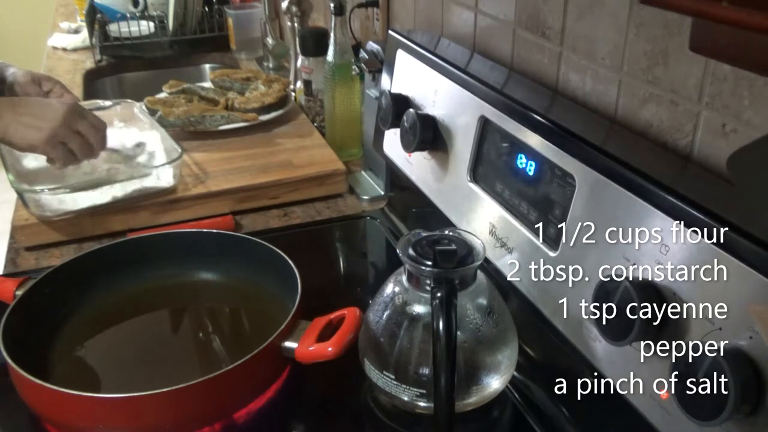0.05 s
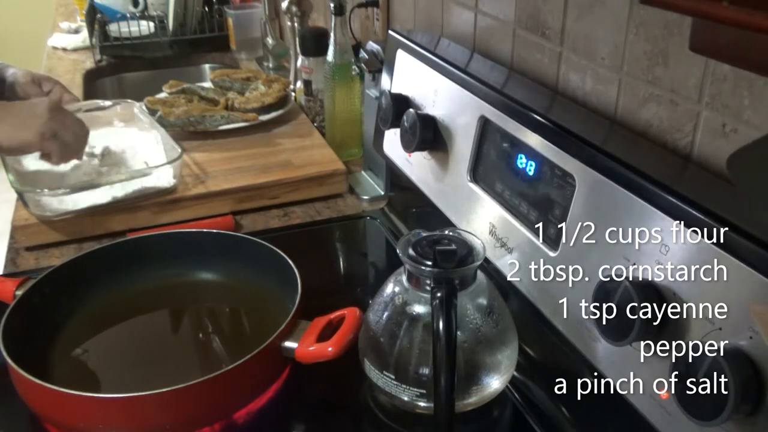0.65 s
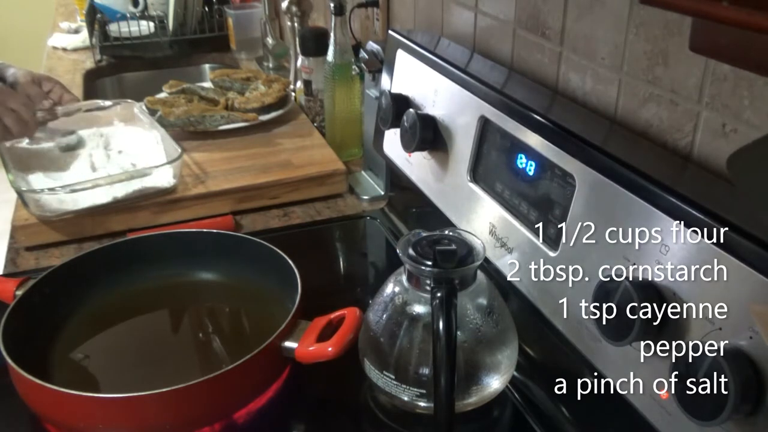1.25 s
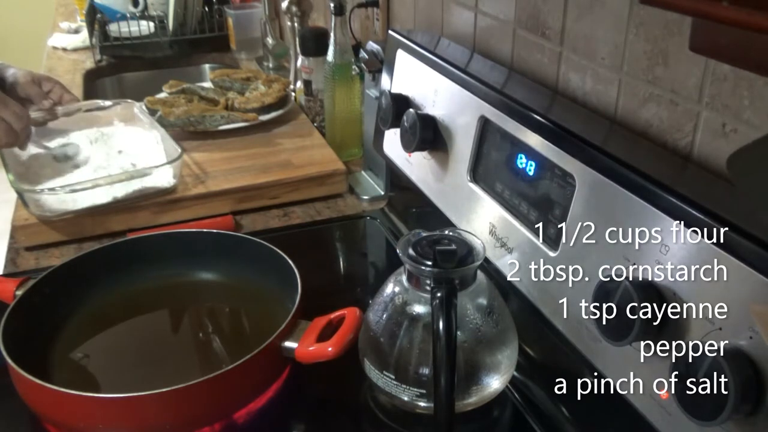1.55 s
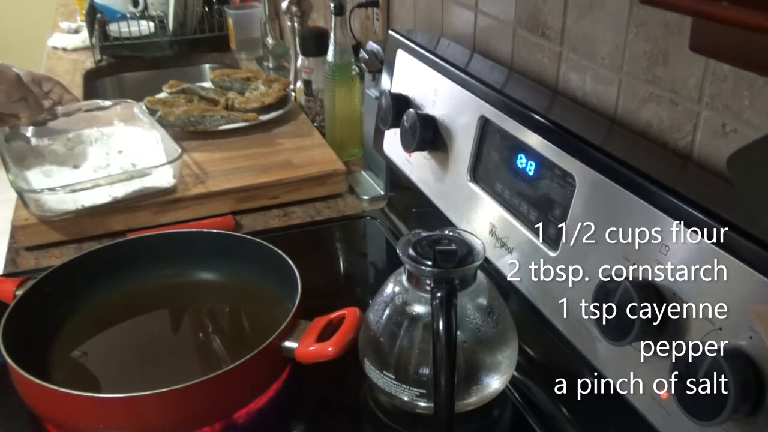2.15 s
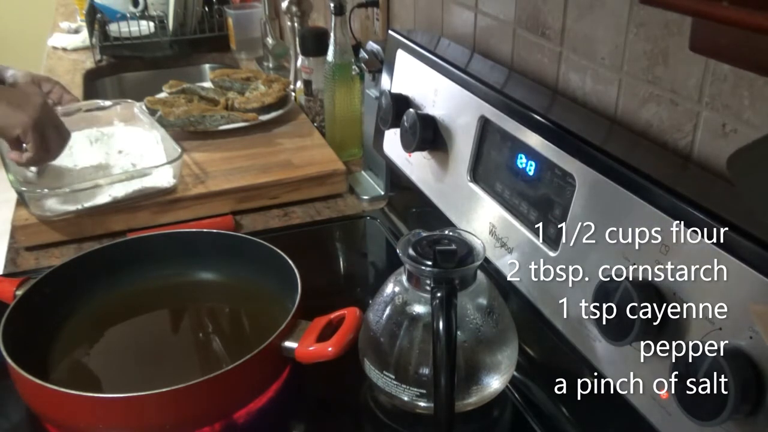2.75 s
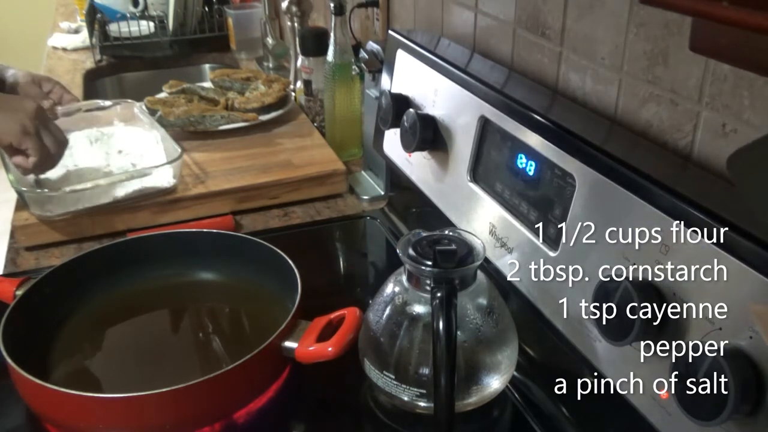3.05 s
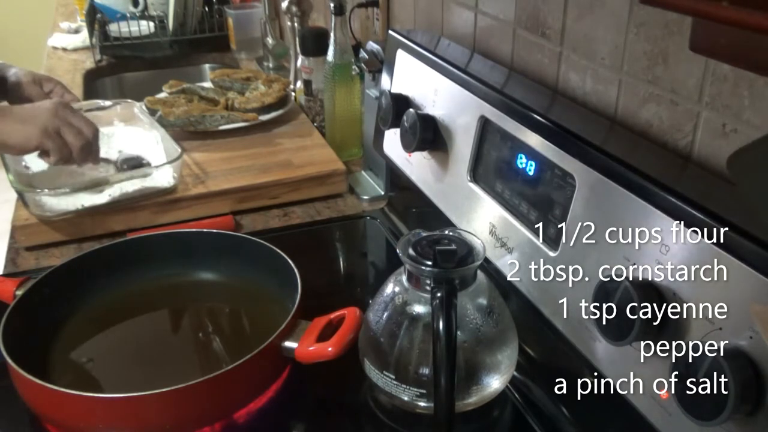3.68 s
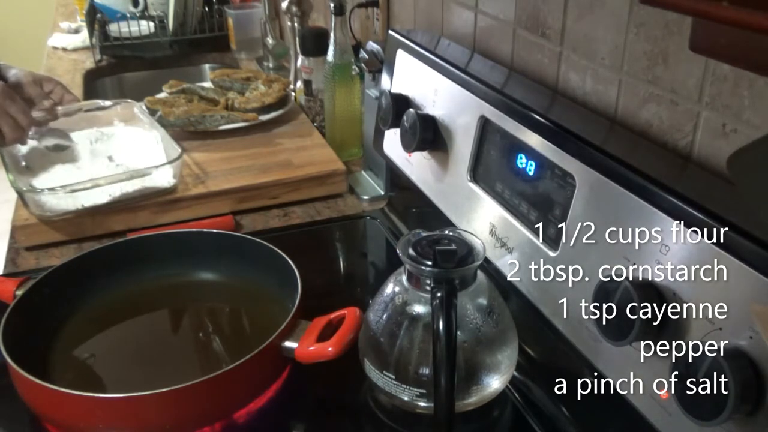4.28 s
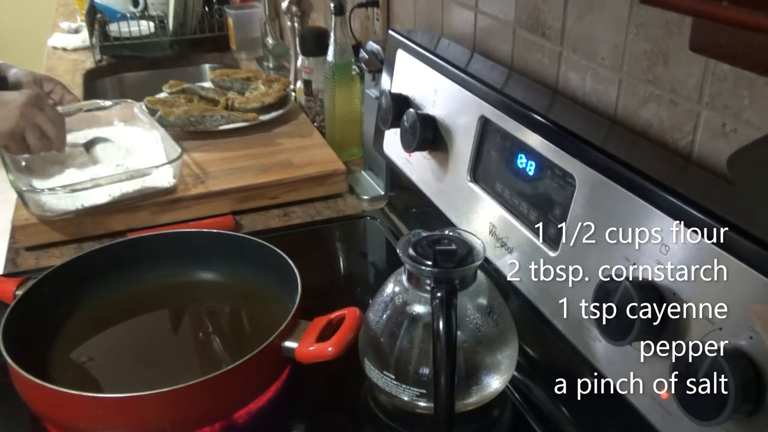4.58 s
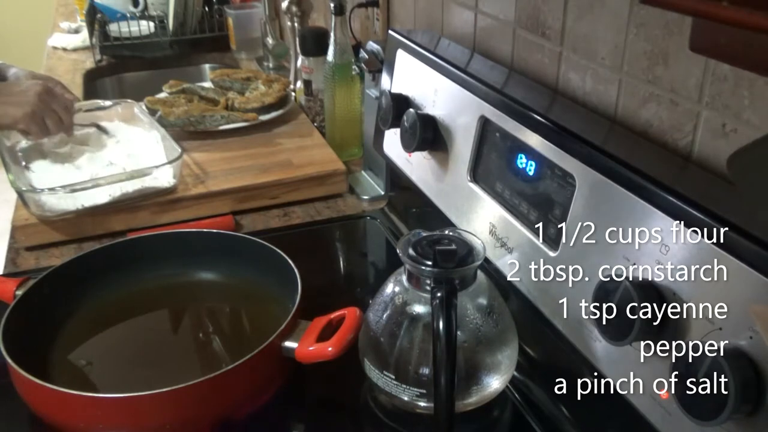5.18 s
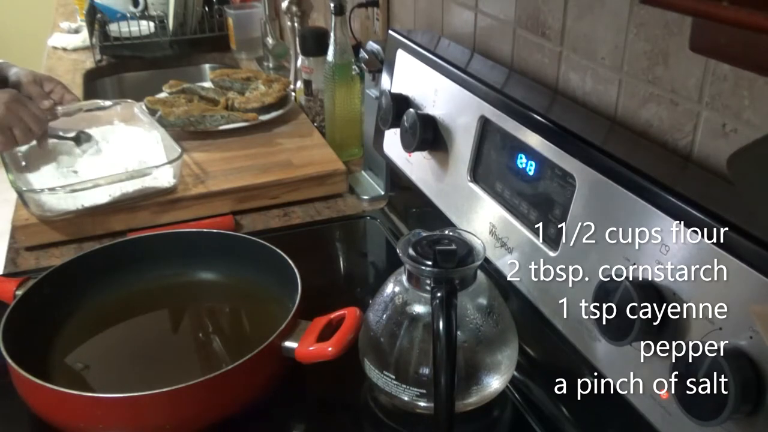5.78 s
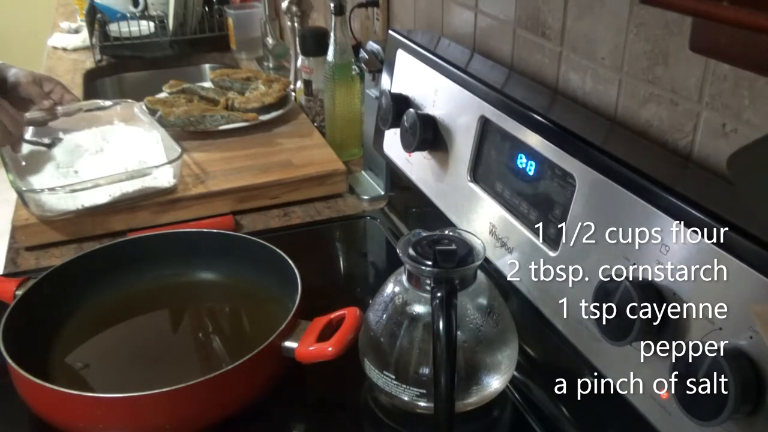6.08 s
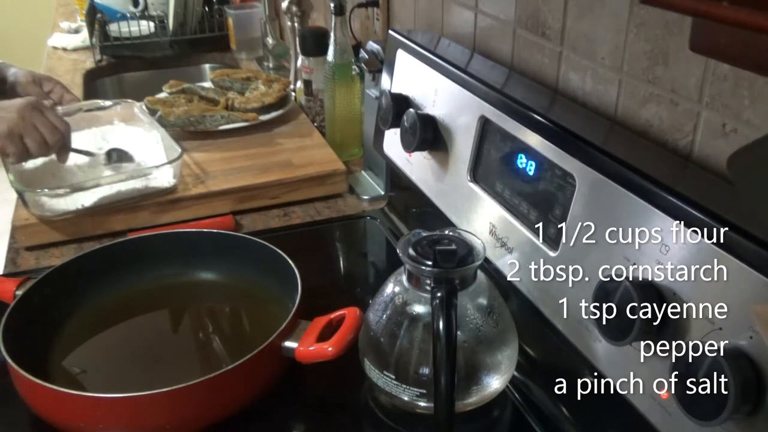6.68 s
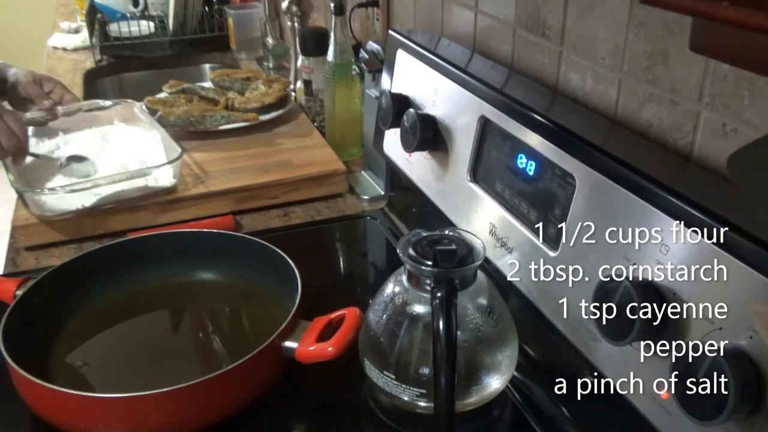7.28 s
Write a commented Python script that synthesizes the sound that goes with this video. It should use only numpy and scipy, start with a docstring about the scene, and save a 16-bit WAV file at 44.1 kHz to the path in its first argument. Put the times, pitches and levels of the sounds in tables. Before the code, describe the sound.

A metal spoon stirs flour in a glass baking dish for about seven and a half seconds, heard close and slightly left in a small kitchen. A soft fan rush, a faint deep drone and a low electric stove hum are present from the start. The spoon knocks unevenly against the glass, each clink short and damped by powder, with quiet grainy swishes and brief scrapes between. One clink comes right at the start, followed by light ticks. Louder knocks land at 1.4 and 1.8 seconds, with a strong pair near 2.1 and lighter ones from 2.6 to 3.6. Another firm knock falls at 4. Around 4.6 the dish judders faintly on its wooden board, a thermostat clicks softly and the hum drops. A sharp, loud clink follows at 4.8, then more swishing and rubbing, with duller knocks near 6, 6.5 and 6.9 seconds.

```python
"""A small kitchen: from the start a fan rushes softly over a deep drone and an electric stove hums.
A metal spoon stirs flour in a glass baking dish on a wooden board. It knocks against the walls,
whose ring the powder damps, swishes through the grains and rubs over the bare bottom.
At 4.6 s the dish judders once on its board. Just after, the thermostat clicks off and the hum
falls to a faint rest; the stirring goes on to the end."""
import sys
import numpy as np
from scipy import signal
from scipy.fft import rfft, irfft, next_fast_len
from scipy.io import wavfile
from scipy.ndimage import uniform_filter1d, map_coordinates

SR = 44100
rng = np.random.default_rng(int(sys.argv[2]) if len(sys.argv) > 2 else 0)


def wav_out(sig):
    """Save sig, one row per channel (or a flat mono array), as 16-bit PCM at SR to the path in sys.argv[1]."""
    wavfile.write(sys.argv[1], SR, np.round(np.clip(np.atleast_2d(sig).T, -1, 1) * 32767).astype(np.int16))


N = 328104

# Fan air spectrum. Each row: frequency in Hz, relative density in dB.
FAN_SPECTRUM = [(15, -22), (30, -9.5), (60, -4.5), (90, -6), (170, -8.5), (260, -4.5), (340, -9), (400, -1),
                (490, -1.5), (600, -7), (1000, -12), (2000, -20.5), (6000, -28.5), (16000, -34.5)]
# Deep drone. Each row: time in seconds, level in dB.
DRONE_LEVELS = [(0, -62.5), (.5, -59), (1.9, -55), (2.2, -70), (7.44, -67)]
# Spoon against glass. Each row: start in seconds, level in dB, hardness in dB of treble over bass,
# powder cushion cut-off in Hz, favoured note in Hz, its lift in dB, ping in Hz.
KNOCKS = [(0.1476, -23.5, -8.5, 15800, 820, 4, 11000), (.431, -43.5, 20, 9000, 1140, 20, 3750),
          (0.518, -46.5, 3, 12000, 2300, 7, 4780), (0.579, -37, -7, 14560, 1180, -1, 2860),
          (0.746, -42, -5, 14000, 1050, 13, 2920), (1.354, -16, -5, 11500, 1020, 10, 6900),
          (1.7799, -16, 6.5, 11100, 920, 4.5, 3340), (2.0751, -10.5, -0.5, 8400, 1170, 5, 5630),
          (2.1641, -14.5, 26, 8200, 1310, 12, 4950), (2.613, -23, -12.5, 9050, 1330, 10, 3530),
          (2.633, -25, -4, 1980, 1050, 3, 3600), (2.7097, -23, 16.5, 19000, 940, 9.5, 5000),
          (2.9822, -23, 4, 11800, 1140, 1.5, 2900), (3.13, -37.5, 28, 14000, 1130, -4, 4100),
          (3.6431, -22.5, -7.5, 14000, 1230, -1, 4260), (3.9908, -14.5, -1.5, 9200, 1075, 5.5, 5200),
          (4.419, -21.5, -9.5, 15000, 1030, 5.5, 4150), (4.5892, -47, -3, 15000, 1910, -1, 2960),
          (4.8462, -11.5, 11, 8460, 1220, 5, 5930), (5.4244, -37.5, -7, 15000, 1070, 10.5, 5800),
          (5.964, -36.5, 25, 9000, 1960, -4, 3900), (6.039, -25.5, -15.5, 2100, 1010, 3, 3020),
          (6.489, -17.5, -2.5, 3670, 1180, 4, 2700), (6.9053, -28, -23, 1450, 450, 13.5, 5430)]
# Modes of the dish on its board. Each row: frequency in Hz, relative level in dB, t60 in seconds.
DISH_MODES = [(305, -9.5, 0.032), (460, -13.5, 0.15), (497, -2, 0.1), (890, -1, 0.11), (974, 3.5, 0.027),
              (1036, -18, 0.026), (1151, 5, 0.074), (1242.4, -8, 0.062), (1349, -6.5, 0.32),
              (1524, -12, 0.19), (1625, -0.5, 0.17), (1690, -28, 0.2), (1879, 4.5, 0.03), (2040, -4, 0.078),
              (2120, 2.5, 0.015), (2263, -17.5, 0.089), (2515, -29, 0.13), (2890, 2, 0.015),
              (2910, -3, 0.021), (3028, 3.5, 0.028), (3690, 4.5, 0.026), (5070, -40, 0.11),
              (5440, -18, 0.11), (5690, -4.5, 0.01), (6720, -5.5, 0.016), (7900, -10, 0.047),
              (8900, -43, 0.24)]
# Dense, quickly damped part of a knock. Each row: frequency in Hz, relative density in dB.
CRACK_SPECTRUM = [(100, -49), (300, -6.5), (750, -3), (1000, -0.5), (1700, 3.5), (2450, -3), (2950, -4.5),
                  (3350, -14.5), (3800, -5.5), (6000, -15), (6350, -19), (8000, -16.5), (11300, -23.5),
                  (16000, -54)]
# Spoon pushing through flour. Each row: peak time in seconds, rise in seconds, fall in seconds,
# effort in dB, singing resonance in Hz.
PUSHES = [(.33, 0.1, 0.076, -41.5, 5800), (.62, 0.039, 0.033, -38, 1150), (.77, .02, 0.014, -43, 3040),
          (.89, 0.036, .04, -49.5, 4100), (1.11, 0.073, 0.045, -45.5, 1150),
          (1.44, 0.051, 0.034, -41.5, 8300), (2.75, 0.042, 0.03, -36.5, 10700),
          (3.1, 0.064, 0.16, -35.5, 6950), (3.33, 0.02, 0.046, -54.5, 6950),
          (3.76, 0.068, 0.026, -47, 8300), (4.09, 0.068, 0.048, -47, 3040), (4.53, .07, 0.049, -45.5, 1680),
          (5, 0.034, 0.036, -35, 5770), (5.25, 0.067, 0.046, -38, 3040), (6.2, 0.093, 0.059, -51, 8300),
          (7.1, 0.069, 0.024, -45.5, 8300)]
# Slipping flour. Each row: frequency in Hz, relative density in dB.
FLOUR_SPECTRUM = [(300, -31), (900, -8), (1150, 2.5), (2300, -3.5), (4000, -6), (5000, -11), (6000, -12),
                  (8500, -12), (11500, -19.5), (13000, -26), (16000, -32)]
# Spoon resonances under friction. Each row: centre in Hz, width in Hz, nominal lift in dB.
SPOON_MODES = [(1150, 80, 7), (1680, 140, 5), (3040, 220, 12), (4100, 280, 12), (5900, 300, 8),
               (6950, 380, 9), (8300, 440, 7), (10700, 500, 8)]
# Stick-slip: the spoon's edge chattering on glass, and one low judder of the dish on its board.
# Each row: start in seconds, length in seconds, relative level in dB, centre in Hz.
STICK_SLIPS = [(0.586, 0.087, -48, 1310), (2.262, 0.13, -48.5, 2100), (4.62, 0.18, -55.5, 392),
               (4.929, .11, -38.5, 2070), (5.201, 0.1, -50.5, 2050), (5.752, 0.057, -51, 1130)]
# Thermostat click. Each row: frequency in Hz, relative density in dB.
CLICK_SPECTRUM = [(500, 11), (2400, 2), (3000, 18), (3700, -5), (8500, 3), (16000, -12)]
# Kitchen reverberation. Each row: frequency in Hz, t60 in seconds.
KITCHEN_T60 = [(150, 0.56), (1000, 0.42), (2500, 0.41), (6000, 0.36), (14000, 0.34)]
# Stereo width of diffuse sound. Each row: frequency in Hz, side gain in dB.
SIDE_GAINS = [(60, -30), (130, -20), (300, -18), (550, -12), (1000, -6.5), (2500, -6.5), (8000, -4.5),
              (10500, -7), (12500, -21)]

THERMOSTAT_OFF_S = 4.667


def amp(db):
    """Decibels to gain."""
    return 10 ** (np.asarray(db) / 20)


def unit_rms(x):
    """Scale to rms 1."""
    return x / np.sqrt(np.mean(x ** 2) + 1e-20)


def unit_energy(x):
    """Scale each row to energy 1."""
    return x / np.sqrt(np.sum(x ** 2, axis=-1, keepdims=True) + 1e-20)


def log_interp(points, hz):
    """Read (Hz, value) points on a log axis."""
    points_hz, values = np.transpose(points)
    return np.interp(np.log(hz + 1), np.log(points_hz + 1), values)


def bell(hz, centre_hz, width_hz):
    """Resonance curve, 1 at its centre."""
    return 1 / (1 + (2 * (hz - centre_hz) / width_hz) ** 2)


def wobble(rate_hz):
    """Smooth random curve."""
    knots = rng.standard_normal(int(N * rate_hz / SR) + 4)
    return map_coordinates(knots, [np.arange(N) * rate_hz / SR])


def filtered(x, gain):
    """Apply gain(Hz) to x."""
    n = x.shape[-1]
    padded = next_fast_len(n + 8192)
    return irfft(rfft(x, padded) * gain(np.fft.rfftfreq(padded, 1 / SR)), padded)[..., :n]


def noise(shape, spectrum):
    """Noise coloured by (Hz, dB) points."""
    return filtered(rng.standard_normal(shape), lambda hz: amp(log_interp(spectrum, hz)))


def add(track, start_s, sound):
    """Mix a sound into a track."""
    part = track[..., round(start_s * SR):][..., :sound.shape[-1]]
    part += sound[..., :part.shape[-1]]


def stereo(mid, side):
    """Two close microphones; long waves reach both alike."""
    side = filtered(side, lambda hz: amp(log_interp(SIDE_GAINS, hz)))
    return np.array([mid + side, mid - side])


def in_kitchen(x, tail_db, early_db):
    """Direct sound, quick echoes off counter and tiles, then the room's tail."""
    hz, frame_s, spectra = signal.stft(rng.standard_normal((2, SR // 2)), SR, nperseg=256)
    decay = amp(-60 * frame_s / log_interp(KITCHEN_T60, hz)[:, None])
    tail = signal.istft(spectra * decay, SR, nperseg=256)[1]
    t = np.arange(tail.shape[1]) / SR
    tail = unit_energy(tail * (1 - np.exp(-t / .003)))
    early = unit_energy(rng.standard_normal(tail.shape) * (t > .001) * np.exp(-t / .0014))
    mid, side = amp(tail_db) * tail + amp(early_db) * early
    mid[0] += 1  # direct path
    return signal.fftconvolve(x[None], stereo(mid, side), axes=1)[:, :N]


def fan():
    """Moving air: a soft, slightly wavering rush."""
    mid, side = noise((2, N), FAN_SPECTRUM)
    return stereo(mid, side) / np.std(mid) * amp(-42.5 + 1.2 * wobble(7.1))


def drone(centre_hz=34, width_hz=6):
    """A deep noise band swells, then drops back near 2 s."""
    band = filtered(rng.standard_normal(N), lambda hz: np.exp(-((hz - centre_hz) / width_hz) ** 2))
    level_db = np.interp(np.arange(N) / SR, *np.transpose(DRONE_LEVELS))
    return amp(level_db) * unit_rms(band)


def stove_hum(hum_hz=120):
    """The element hums at twice the mains rate, only faintly once the thermostat opens."""
    t = np.arange(N) / SR
    tone = np.sqrt(2) * np.sin(2 * np.pi * hum_hz * t + .06 * wobble(5))
    heating = np.exp(-np.maximum(t - THERMOSTAT_OFF_S, 0) / .013)
    return tone * (amp(-48.5) * heating + amp(-56.5)) * amp(wobble(3.7))


def contact_gain(hz, hardness_db, cushion_hz, note_hz, note_db, ping_hz):
    """A bare edge is bright, powder dulls it, and the spot struck favours a note and a ping."""
    pivot_hz, span_octaves, ping_db, leak_db = 1860, .9, 8, -17
    edge_db = hardness_db / 2 * np.tanh(np.log2((hz + 1) / pivot_hz) / span_octaves)
    spot_db = note_db * bell(hz, note_hz, .23 * note_hz) + ping_db * bell(hz, ping_hz, .06 * ping_hz)
    cushion = 1 / np.sqrt(1 + (hz / cushion_hz) ** 8)
    return amp(edge_db + spot_db) * (cushion + amp(leak_db))


def knocks(crack_t60_s=.068, attack_s=.0014):
    """Each knock rings the dish through its own contact; the pressing spoon detunes the modes a little."""
    out, t = np.zeros((2, N)), np.arange(SR // 4) / SR
    mode_hz, mode_db, t60_s = np.transpose(DISH_MODES)
    decay = amp(-60 * t / t60_s[:, None])
    attack = 1 - np.exp(-t / attack_s)
    for start_s, level_db, *contact in KNOCKS:
        hz = mode_hz * (1 + .005 * rng.standard_normal(len(mode_hz)))
        strengths = unit_energy(amp(mode_db + 1.34 * rng.standard_normal(len(hz))))
        phase = rng.uniform(0, 2 * np.pi, (len(hz), 1))
        modes = unit_energy(np.sin(2 * np.pi * hz[:, None] * t + phase) * decay)
        ring = (strengths * contact_gain(hz, *contact)) @ modes
        grit = unit_rms(noise(len(t), CRACK_SPECTRUM))
        crack = filtered(grit, lambda f: contact_gain(f, *contact))
        crack *= unit_energy(amp(-60 * t / crack_t60_s))
        knock = in_kitchen((ring + crack) * attack, tail_db=-5.5, early_db=-12)
        add(out, start_s, amp(level_db) * knock / np.std(knock[:, :SR // 50]))  # rms of first 20 ms
    return out


def pushes(glide_db=-57, climb_per_s=.3, sag=.07):
    """Pushes swell above a steady glide; pitch climbs as the contact slides and sags as it eases."""
    t = np.arange(N) / SR
    peak_s, rise_s, fall_s, push_db, singing_hz = np.transpose(PUSHES)[..., None]
    from_peak = np.maximum((peak_s - t) / rise_s, (t - peak_s) / fall_s)
    swells = np.exp(-np.minimum(from_peak, 10) ** 1.6)
    effort = amp(glide_db) + np.sum(amp(push_db) * swells, axis=0)
    active, depth = swells.argmax(axis=0), swells.max(axis=0)
    pitch_ratio = 1 + climb_per_s * (t - peak_s[active, 0]) - sag * (1 - depth) ** 4
    return 20 * np.log10(effort), pitch_ratio, singing_hz[active, 0]


def stirring(singing_db=7):
    """Fine grains slip under the spoon in clumps; its resonances speak and rise as it presses."""
    grains = rng.standard_normal(N) * amp(2.5 * wobble(700) + 1.8 * wobble(45))
    hz, frame_s, spectra = signal.stft(grains, SR, nperseg=1024)
    frames = np.minimum(np.round(frame_s * SR).astype(int), N - 1)
    effort_db, pitch_ratio, singing_hz = pushes()
    pressure = np.interp(effort_db[frames], [-60, -47], [.2, 1])
    bend = pitch_ratio[frames] * (1 + .016 * wobble(7)[frames])
    lift_db = 0
    for centre_hz, width_hz, mode_db in SPOON_MODES:
        extra_db = singing_db * bell(singing_hz[frames], centre_hz, .2 * centre_hz)
        extra_db += 2 * wobble(7)[frames]
        lift_db += (mode_db + extra_db) * bell(hz[:, None], centre_hz * bend, width_hz)
    colour_db = log_interp(FLOUR_SPECTRUM, hz)[:, None] + pressure * lift_db
    swish = signal.istft(spectra * amp(colour_db), SR, nperseg=1024)[1][:N]
    return in_kitchen(unit_rms(swish) * amp(effort_db - 5), tail_db=-9, early_db=-6)


def stick_slip(slips_per_s=900):
    """Uneven slips excite one band: spoon edge on glass or, once and low, the dish on its board."""
    out, t = np.zeros(N), np.arange(SR // 4) / SR
    for start_s, length_s, level_db, centre_hz in STICK_SLIPS:
        slips = (rng.random(len(t)) < slips_per_s / SR) * rng.standard_normal(len(t))
        band = filtered(slips, lambda hz: bell(hz, centre_hz, .4 * centre_hz))
        arch = np.sqrt(np.abs(np.sin(np.pi * np.minimum(t / length_s, 1))))
        add(out, start_s, amp(level_db - 5.5) * unit_rms(band) * arch)
    return in_kitchen(out, tail_db=5.5, early_db=11.5)


def thermostat_click(t60_s=.11):
    """The switch opens with a small snap."""
    out, t = np.zeros(N), np.arange(SR // 10) / SR
    snap = unit_rms(noise(len(t), CLICK_SPECTRUM)) * amp(-60 * t / t60_s)
    add(out, THERMOSTAT_OFF_S, amp(-43.5) * snap)
    return in_kitchen(out, tail_db=-13, early_db=8)


def gain_control(x, limit_db=-12, recovery_db_per_s=2):
    """Gain drops at once on a knock above the limit, then creeps back."""
    power = np.abs(uniform_filter1d(np.mean(x ** 2, axis=0), size=SR // 100))
    over_db = np.maximum(10 * np.log10(power + 1e-12) - limit_db, 0)
    recovered_db = recovery_db_per_s * np.arange(N) / SR
    return x * amp(recovered_db - np.maximum.accumulate(over_db + recovered_db))


def scene():
    """Spoon and dish over the kitchen's background; the whole mix leans slightly left."""
    spoon_and_dish = knocks() + stirring() + stick_slip()
    background = fan() + drone() + stove_hum() + thermostat_click()
    return (spoon_and_dish + background) * amp([[.17], [-.17]])


def record(dry):
    """Gain control, soft clipping, 16 kHz band limit."""
    ducked = gain_control(dry)
    rounded = ducked / (1 + np.abs(ducked) ** 6) ** (1 / 6)
    return filtered(rounded, lambda hz: hz < 16000)


dry = scene()
out = record(dry)
wav_out(out)
```